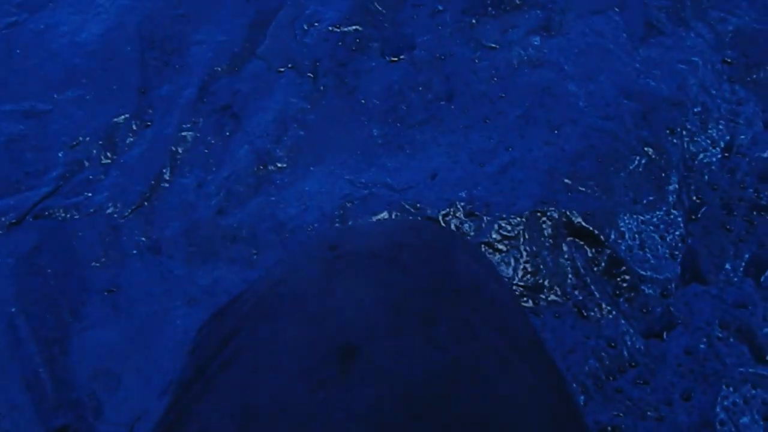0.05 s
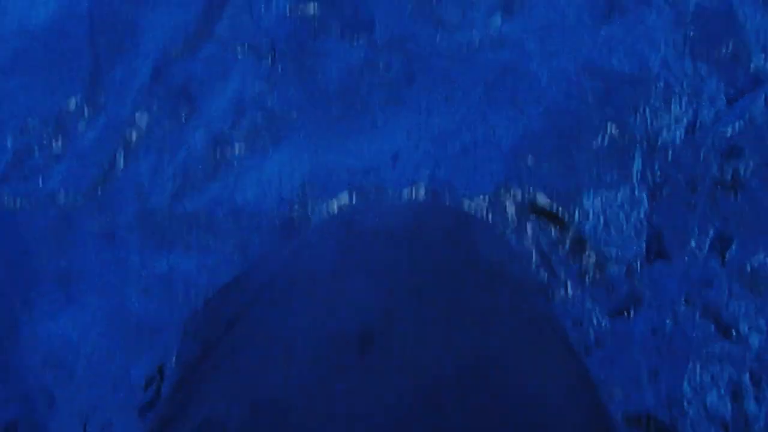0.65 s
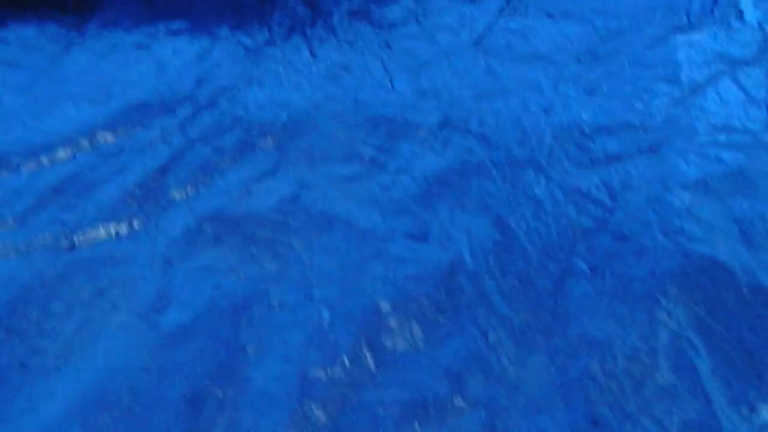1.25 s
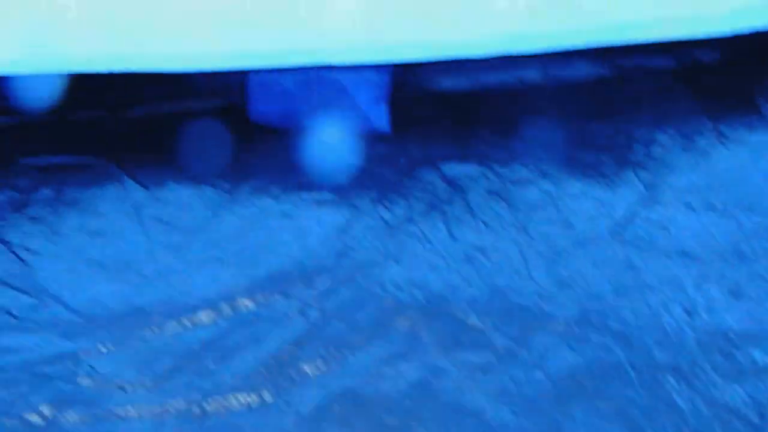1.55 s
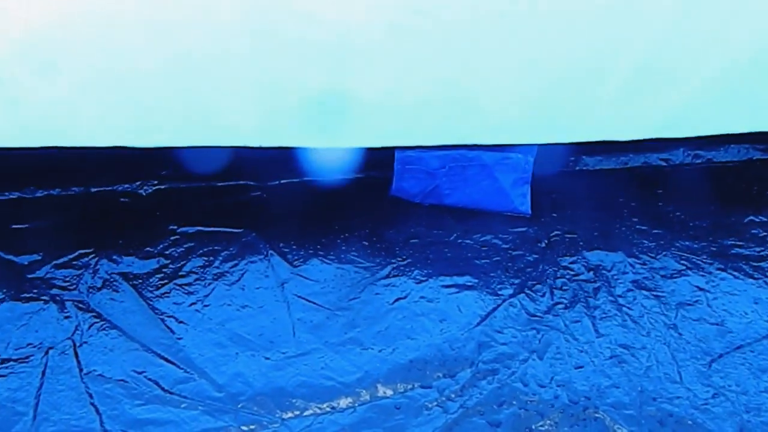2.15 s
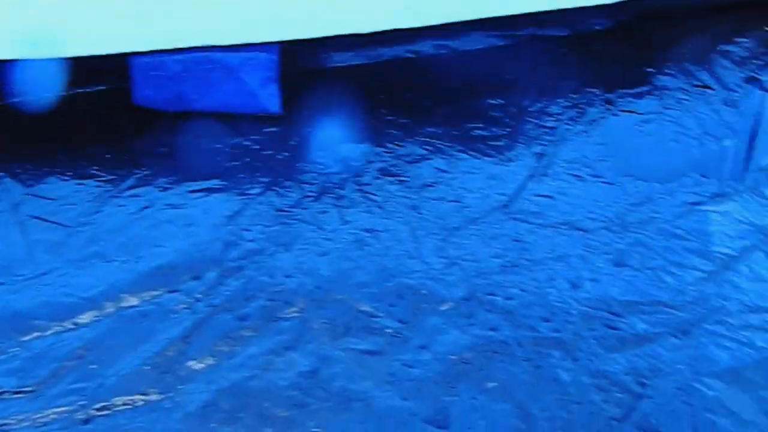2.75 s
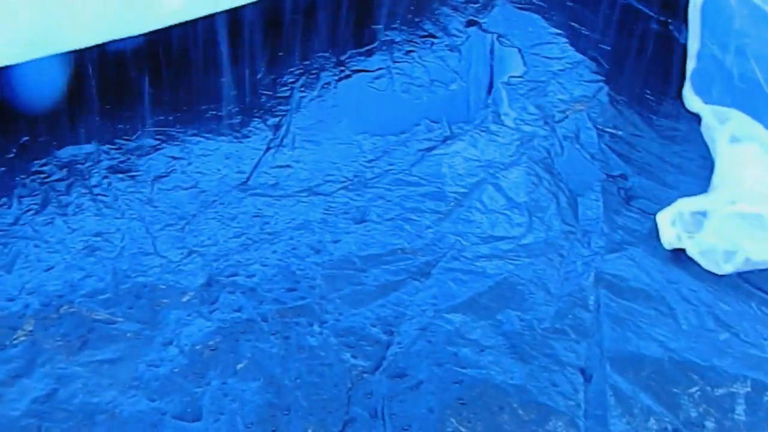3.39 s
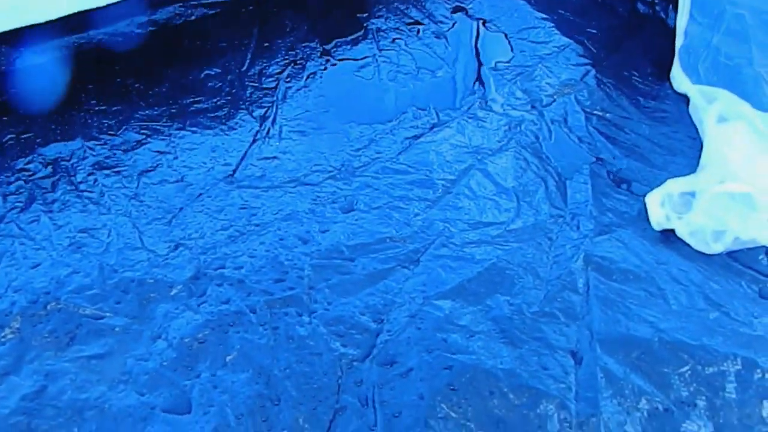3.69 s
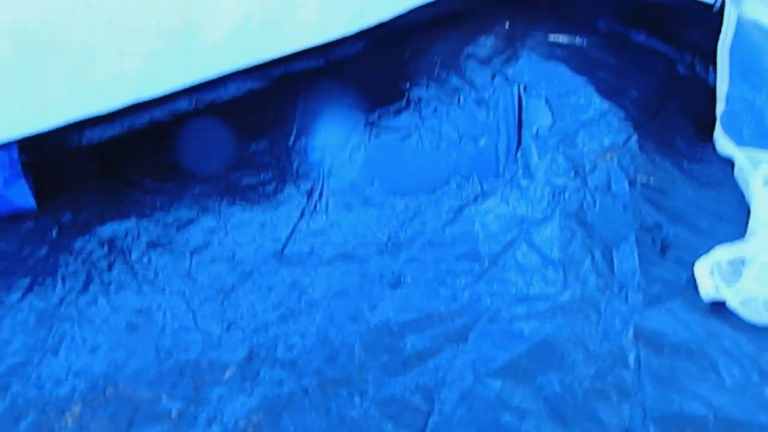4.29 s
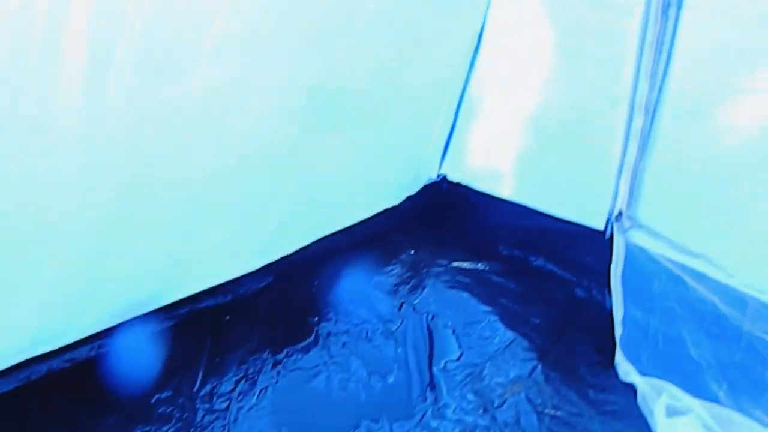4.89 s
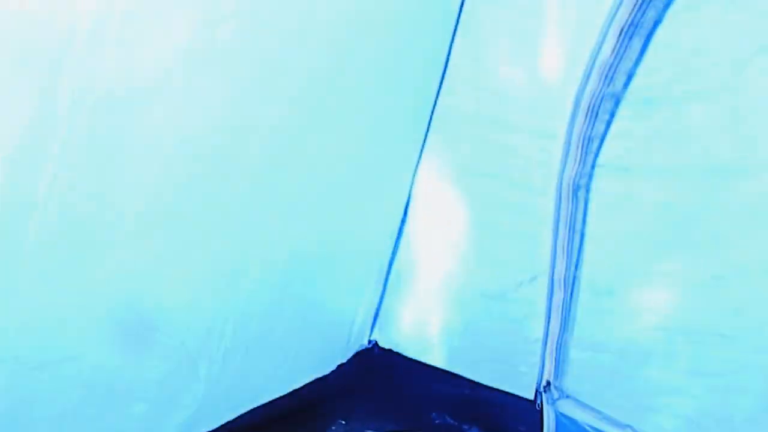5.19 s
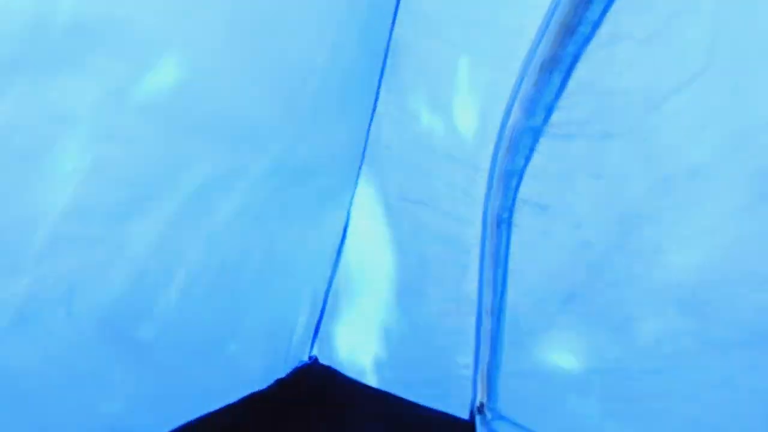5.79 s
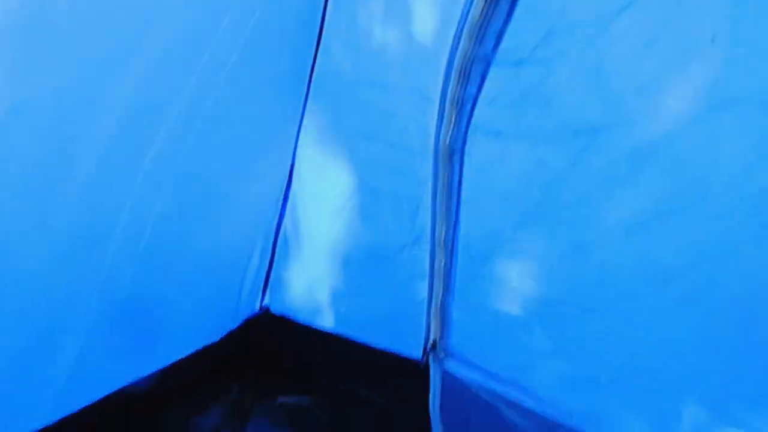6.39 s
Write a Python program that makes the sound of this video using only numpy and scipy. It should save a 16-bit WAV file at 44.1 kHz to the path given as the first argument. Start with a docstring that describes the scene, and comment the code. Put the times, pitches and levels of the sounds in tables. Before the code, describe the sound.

A loud rush of water hits a nylon tent, drumming, slapping and spraying on the slack fabric. It runs off in quiet gurgles, plops and drips on the groundsheet. A second rush lands, then a water-filled fold drains in small gulps and a very faint whistle sounds far off. A third rush strikes and trickles away. The microphone is inside the tent, with soft outdoor air behind.

```python
"""Inside a nylon tent, over a soft outdoor wash. At 0 s a rush of water drums the slack fabric,
patters and sprays; single gouts slap it harder. Runoff then gurgles, plops and drips on the
groundsheet; the sound stutters at 1.7 s. A second rush lands at 2.9 s. From 4.2 s a water-filled
fold drains in gulps, and a faint whistle follows. The third rush lands at 5.5 s and runs off."""
import sys
import numpy as np
from scipy import signal
from scipy.fft import rfft, irfft
from scipy.io import wavfile
from scipy.ndimage import uniform_filter1d

SR = 44100
rng = np.random.default_rng(int(sys.argv[2]) if len(sys.argv) > 2 else 0)


def materialize(psi):
    """Save the field psi as 16-bit PCM at rate SR to the path in sys.argv[1].

    A 1-D psi becomes a single channel; in a 2-D psi each row is a channel.
    """
    bounded = np.clip(np.atleast_2d(psi).T, -1, 1)
    quanta = np.round(bounded * 32767).astype(np.int16)
    wavfile.write(sys.argv[1], SR, quanta)


N = 292881
TIME_S = np.arange(N) / SR
BINS_HZ = np.fft.rfftfreq(4096, 1 / SR)

# Table levels are relative within a layer.
# sheets of water, several per rush: t/s, rise/s, hold/s, level/dB, brightness/dB, froth/dB, fall/(dB/s)
WATER_SHEETS = [ (-.01, 0.017, 0.16, -20.5, 0, 3.5, 298), (0.181, 0.012, 0.12, -28, -2, 3, 244),
                (0.361, 0.037, .012, -24, 4.5, 4.5, 200), (.437, 0.01, 0.034, -26, 6.5, 2.5, 257),
                (0.526, 0.019, 0.091, -42, 4.5, 6.5, 72), (2.881, 0.053, .02, -43, 3, 7, 200),
                (2.953, 0.036, 0.099, -21.5, -.5, 4, 400), (3.093, 0.023, 0.069, -22.5, -1.5, 1, 143),
                (3.216, 0.0052, 0.035, -25, -2.5, 3.5, 500), (3.312, 0.026, 0.098, -43.5, -7, 4, 150),
                (3.394, 0.024, 0.14, -31.5, 0.5, 7.5, 123), (3.464, 0.078, 0.015, -39, 13.5, -8, 137),
                (3.624, 0.018, 0.018, -32.5, 0, 4, 142), (4.056, 0.0077, 0.0042, -48, 3.5, 4.5, 154.5),
                (5.446, 0.06, .008, -42.5, 2.5, 6.5, 200), (5.512, 0.028, .11, -19.5, -1.5, 2.5, 157),
                (5.563, 0.033, 0.023, -26, 3.5, 11.5, 200), (5.668, 0.021, 0.06, -23, 0, 4, 243),
                (5.787, 0.044, 0.13, -31.5, -1.5, 3.5, 206), (5.999, 0.007, 0.0085, -29, 6, 6, 200),
                (6.063, 0.036, 0.02, -35.5, 4, 9.5, 150), (6.147, 0.021, 0.023, -34, 7, 13, 117),
                (6.235, 0.017, 0.016, -35.5, 3, 3, 134), ]
# voices of a sheet: offset/dB, brightness share, froth share, drizzle/dB
DRUM = (2.5, -1, 0, -27)
PATTER = (-1.5, -0.46, 1, -19)
CHURN = (-3, -0.11, 1, -15)
SPRAY = (-5.5, 1.17, 0, -11.5)
# spectrum of one drop on wet fabric: f/Hz, level/dB
FABRIC_SPECTRUM = [(15, -17), (25, -20), (59, -5), (144, -1), (255, -3.5), (371, -6.5), (473, -10.5),
                   (769, -6), (1120, -6), (1640, -13), (2520, -22.5), (7830, -28.5), (8970, -29),
                   (14200, -37.5), (15800, -46)]
# wall resonances and hollows: f/Hz, width/Hz, level/dB
WALL_MODES = [(335, 80, 3), (444, 39, -2), (756, 510, 0.5), (1630, 300, 0)]
# gouts slapping the fabric: t/s, level/dB, f/Hz, t60/s
GOUT_SLAPS = [(.061, -3, 338, 0.069), (.153, -2.5, 362, 0.056), (.216, -9, 900, 0.053),
              (.267, -21, 6900, 0.14), (.307, -21, 804, 0.051), (.389, -10.5, 1760, 0.01),
              (.405, -11, 6160, .2), (.451, -9, 460, 0.079), (.4845, -5.5, 2750, 0.055),
              (.53, -19.5, 2950, .052), (.7095, -24, 990, 0.043), (2.824, -29.5, 928, 0.04),
              (2.847, -40, 900, 0.045), (2.938, -26, 175, .05), (2.964, -21, 696, 0.063),
              (2.981, -12.5, 203, .05), (3.066, -7, 520, 0.029), (3.08, -14, 400, 0.016),
              (3.082, -15, 11000, 0.035), (3.163, -14.5, 910, 0.031), (3.2248, -12, 890, 0.023),
              (3.235, -8.5, 365, 0.041), (3.252, -14, 720, .076), (3.376, -22, 770, 0.071),
              (3.553, -15.5, 2440, 0.048), (3.67, -31, 9880, 0.3), (5.491, -27.5, 740, .05),
              (5.522, -15.5, 1430, 0.057), (5.534, -10, 247, 0.095), (5.612, -11, 727, .07),
              (5.731, -15, 133, 0.2), (5.743, -9.5, 660, 0.053), (5.7435, -10, 3870, 0.016),
              (5.843, -18.5, 1160, .06), (5.876, -16.5, 245, .044), (5.918, -18, 576, 0.044),
              (6.004, -22.5, 6000, 0.36), (6.151, -13.5, 1380, 0.095), (6.2, -16, 1500, 0.077),
              (6.245, -19.5, 1700, 0.13), (6.367, -21.5, 1360, .12)]
# drips on the groundsheet: t/s, level/dB, f/Hz, t60/s
FLOOR_DRIPS = [(.876, -28, 2150, 0.039), (.958, -31.5, 7900, 0.021), (1.08, -40.5, 8000, .06),
               (1.128, -38, 12000, 0.088), (1.181, -38, 5460, 0.19), (1.329, -33.5, 3600, 0.14),
               (1.332, -35, 9200, 0.17), (1.609, -32, 6600, 0.19), (1.737, -35, 3380, 0.07),
               (1.759, -32.5, 1630, 0.044), (1.86, -38.5, 4300, 0.1), (1.956, -29, 1050, 0.19),
               (2.128, -38, 2600, .15), (2.286, -35.5, 2180, 0.15), (2.368, -36.5, 6840, 0.078),
               (2.397, -32.5, 2020, 0.16), (2.473, -28.5, 1790, 0.027), (2.488, -33, 2050, .068),
               (2.508, -39, 10000, 0.055), (2.835, -34.5, 4900, 0.32), (3.881, -39, 7000, 0.056),
               (3.932, -41, 5840, 0.1), (4.253, -28, 2050, 0.15), (4.401, -30.5, 1380, .03),
               (4.497, -37, 8000, 0.11), (4.52, -37, 10500, 0.12), (4.65, -31.5, 2080, .07),
               (4.7325, -33.5, 907, .042), (4.796, -32, 2600, 0.1), (4.841, -32.5, 8500, 0.14),
               (4.858, -32.5, 2630, 0.29), (4.999, -36, 2350, 0.068), (5.1315, -31, 2360, 0.11),
               (6.367, -31.5, 6900, 0.31), (6.555, -35, 3950, 0.11)]
# bumps of the slack floor: t/s, level/dB, f/Hz, t60/s
FLOOR_BUMPS = [(1.398, -40, 170, 0.058), (1.513, -41.5, 138, .08), (2.4725, -33.5, 167, 0.023),
               (2.826, -34, 246, 0.16), (2.88, -39, 280, .07), (4.239, -39.5, 106, .06),
               (4.325, -36.5, 275, 0.18)]
# single bubble plops and small ringing droplets: t/s, level/dB, f/Hz
PLOPS_AND_PINGS = [(1.024, -40, 3320), (1.114, -36.5, 4170), (1.181, -41, 5250), (1.223, -39, 3280),
                   (1.329, -32, 3430), (1.486, -36.5, 1900), (1.565, -37, 1360), (1.669, -38.5, 755),
                   (1.739, -38, 820), (1.759, -26.5, 802), (1.99, -30.5, 586), (2.002, -33, 800),
                   (2.066, -35.5, 790), (2.135, -35, 1520), (2.355, -30.5, 1410), (2.396, -32, 1480),
                   (2.432, -35, 1360), (2.465, -36, 1250), (2.541, -34.5, 1820), (2.704, -36.5, 1230),
                   (2.846, -30, 755), (3.226, -10, 807), (3.253, -17, 746), (3.263, -10.5, 685),
                   (3.272, -12, 630), (3.749, -28, 620), (3.882, -38, 7600), (3.932, -39, 5900),
                   (4.252, -30, 1110), (4.277, -21, 1220), (4.374, -32, 764), (4.4, -36, 1240),
                   (4.432, -31, 770), (4.648, -28, 644), (4.664, -30.5, 650), (4.734, -32, 1850),
                   (5.043, -36, 855), (5.093, -39, 764), (6.171, -11, 890), (6.202, -15.5, 834)]
# runoff, one curve after each rush: t/s, gurgle level/dB, fizz level/dB
EARLY_RUNOFFS = [
    [(0.9, -50.5, -51), (1.07, -67, -55.5), (1.312, -73, -54), (1.544, -51, -56.5), (1.704, -52.5, -54),
     (2.09, -48.5, -53.5), (2.294, -49, -49), (2.658, -56, -52), (2.88, -53.5, -52.5)],
    [(3.85, -51, -64), (4.064, -63, -73), (4.288, -56, -50.5), (4.428, -49, -83), (4.54, -47.5, -60),
     (4.696, -50.5, -50), (4.808, -49.5, -51), (5.316, -53, -49), (5.46, -53, -52)],
]
FINAL_RUNOFF = [(6.42, -52, -68), (6.514, -48, -49), (6.64, -53.5, -52)]
RUNOFF_CURVES = EARLY_RUNOFFS + [FINAL_RUNOFF]
GURGLE_COLUMN, FIZZ_COLUMN = 1, 2
# spread of bubble pitches: f/Hz, level/dB
GURGLE_SPECTRUM = [(240, -14), (400, -20), (505, -5.5), (644, -6.5), (993, -15), (1250, -4.5), (1450, -6),
                   (1950, -6.5), (5000, -11.5), (6500, -49), (11000, -120)]
# resonances of a water-filled fold: f/Hz, width/Hz, level/dB
FOLD_MODES = [(696, 180, -2), (1220, 160, 0), (1750, 180, -2.5), (2360, 170, -14), (3200, 180, -17),
              (3700, 170, -26)]
# gulps leaving the fold: t/s, hold/s, level/dB, fall/(dB/s)
FOLD_GULPS = [(4.24, .01, -44, 400), (4.29, 0.096, -42.5, 94), (4.64, 0.016, -44.5, 250),
              (4.73, 0.068, -46.5, 112)]
# outdoor wash: f/Hz, level/dB
WASH_SPECTRUM = [(15, -50), (25, -3.5), (284, 4), (392, 0.5), (654, -10.5), (791, -2), (1090, -6),
                 (1250, -7.5), (1390, -8), (2520, -11), (3220, -8.5), (4570, -13), (9990, -14),
                 (14200, -20), (15800, -27)]
# far whistle: t/s, level/dB
WHISTLE_CURVE = [(4.7, -77), (4.95, -64), (5.2, -64), (5.45, -65), (5.55, -73)]
# brief level dips: start/s, end/s
STUTTER_GAPS = [(1.694, 1.7125), (1.7145, 1.7235), (1.7265, 1.734)]


def amp(db):
    return 10 ** (np.asarray(db) / 20)


def unit_rms(x):
    return x / np.sqrt(np.mean(x ** 2) + 1e-20)


def spectrum(points):
    """Gain per bin, interpolated over log frequency."""
    hz, db = np.transpose(points)
    return amp(np.interp(np.log(BINS_HZ + 1), np.log(hz + 1), db))


def lowpass(hz, order):
    return 1 / np.sqrt(1 + (BINS_HZ / hz) ** (2 * order))


def highpass(hz, order):
    return np.sqrt(1 - lowpass(hz, order) ** 2)


def resonance(hz, width_hz):
    return 1 / (1 + (2 * (BINS_HZ - hz) / width_hz) ** 2)


def colour(x, gain):
    """Minimum-phase filter, peak gain 1: sharp attack, then ringing."""
    log_gain = np.log(np.maximum(gain / gain.max(), 1e-5))
    mirrored = np.concatenate([log_gain, log_gain[-2:0:-1]])
    taps = np.fft.ifft(np.exp(np.conj(signal.hilbert(mirrored)))).real
    return signal.oaconvolve(x, taps)[:len(x)]


def envelope(curves, column):
    """Gain per sample from a dB column; silent outside the curves."""
    gains = [amp(np.interp(TIME_S, rows[:, 0], rows[:, column], left=-200, right=-200))
             for rows in map(np.array, curves)]
    return uniform_filter1d(sum(gains), size=128)


def swell(start_s, rise_s, hold_s, fall_db_per_s):
    """Rise, hold, fall; one gain per 32 samples."""
    t = np.maximum(TIME_S[::32] - start_s, 0)
    return np.minimum(t / rise_s, 1) * amp(-fall_db_per_s * np.maximum(t - rise_s - hold_s, 0))


def power_sum(swells):
    """Swells added in power; one gain per sample."""
    return np.interp(TIME_S, TIME_S[::32], np.sqrt(sum(gain ** 2 for gain in swells)))


def add(mix, start_s, sound):
    part = mix[max(round(start_s * SR), 0):][:len(sound)]
    part += sound[:len(part)]


def steady(x, samples):
    """Evens out the level, keeps the finer grain."""
    power = uniform_filter1d(uniform_filter1d(x ** 2, samples), samples)
    return x / np.sqrt(np.abs(power) + 1e-3 * np.mean(x ** 2))


def wander(cutoff_hz):
    """Slow noise, rms 1."""
    hz = np.fft.rfftfreq(N, 1 / SR)
    return unit_rms(irfft(rfft(rng.standard_normal(N)) / (1 + (hz / cutoff_hz) ** 4), N))


def impacts(per_s, spread_db):
    """Random impulses: many small, few large."""
    size = amp(spread_db * np.minimum(rng.exponential(1, N), 4))
    return size * rng.choice([-1, 1], N) * (rng.random(N) < per_s / SR)


def shimmer(x, depth_db, patch_hz=700, patch_s=.008):
    """Each splash favours its own pitches: brief random patches of colour."""
    frames = signal.stft(x, nperseg=256)[2]
    across_bins = signal.windows.gaussian(21, patch_hz * 256 / SR / np.e)
    across_frames = signal.windows.gaussian(21, patch_s * SR / 128 / np.e)
    blur = np.outer(across_bins, across_frames)
    patches = unit_rms(signal.fftconvolve(rng.standard_normal(frames.shape), blur, "same"))
    return unit_rms(signal.istft(frames * amp(depth_db * patches), nperseg=256)[1][:N])


def rushes(heave_hz=130, drum_hz=450, churn_hz=1100, spray_hz=2500, clump_db=3, spray_clump_db=1):
    """Drops land in clumps: heavy ones drum, lighter ones patter and churn in air, the finest hiss."""
    clumps = wander(51)
    heavy = unit_rms(impacts(1300, 2.9) * amp(clump_db * clumps))
    light = heavy + amp(8.5) * unit_rms(impacts(4500, 4.1) * amp(clump_db * clumps))
    fine = unit_rms(impacts(20000, 4.2)) * amp(spray_clump_db * clumps) + amp(-3.5) * heavy
    trapped_air = froth(514.5, 2880, per_s=900, cycles=18.7, spread_db=6.3, octaves_per_s=23.8)
    wet = light + amp(-10.5) * trapped_air
    modes_db = sum(db * resonance(hz, width_hz) for hz, width_hz, db in WALL_MODES)
    wall = spectrum(FABRIC_SPECTRUM) * amp(modes_db)
    heave = steady(colour(heavy, wall * lowpass(heave_hz, 3)), samples=2200)
    drum = steady(colour(heavy, wall * highpass(heave_hz, 3) * lowpass(drum_hz, 4)), samples=900)
    patter = steady(colour(wet, wall * highpass(drum_hz, 4) * lowpass(churn_hz, 4)), samples=700)
    churn = steady(colour(wet, wall * highpass(churn_hz, 4) * lowpass(spray_hz, 4)), samples=700)
    spray = steady(colour(shimmer(fine, depth_db=0.8), wall * highpass(spray_hz, 4)), samples=800)
    load = sheet_flow(*DRUM)
    sway = (load / amp(-20)) ** 0.16  # a heavy load sets the whole wall heaving
    return ((drum + amp(-6.5) * sway * heave) * load + patter * sheet_flow(*PATTER)
            + churn * sheet_flow(*CHURN) + spray * sheet_flow(*SPRAY))


def sheet_flow(offset_db, bright_share, froth_share, drizzle_db):
    """Gain of one voice under all sheets and the stray drops behind them."""
    swells = []
    for start_s, rise_s, hold_s, db, bright_db, froth_db, fall_db_per_s in WATER_SHEETS:
        gain = amp(db + bright_share * bright_db + froth_share * froth_db)
        swells.append(gain * swell(start_s, rise_s, hold_s, fall_db_per_s))
        swells.append(amp(db + drizzle_db) * swell(start_s, rise_s + hold_s, 0, fall_db_per_s=37))
    return amp(offset_db) * power_sum(swells)


def splats(rows, sharpness, burst_gain, grains_per_cycle):
    """A blow and its dying droplet burst ring a patch of fabric; brighter bursts are denser."""
    out, t = np.zeros(N), np.arange(0, .2, 1 / SR)
    for start_s, db, hz, t60_s in rows:
        burst = rng.uniform(-1.52, 1, len(t)) * (rng.random(len(t)) < grains_per_cycle * hz / SR)
        burst *= burst_gain * np.exp(-np.log(1000) * t / t60_s)
        burst[0] = 1  # first contact
        detune = (BINS_HZ + 1) / hz - hz / (BINS_HZ + 1)
        blow = colour(burst, 1 / (1 + (sharpness * detune) ** 2))
        add(out, start_s, amp(db) * blow / np.abs(blow).max())
    return out


def mist(low_hz=5200, high_hz=13500, bright_share=.8):
    """Droplets thrown up by each sheet crackle down after it."""
    drops = shimmer(impacts(5000, 3.2), depth_db=2.5)
    crackle = steady(colour(drops, highpass(low_hz, 2) * lowpass(high_hz, 4)), samples=1400)
    falling = power_sum(
        amp(db + bright_share * bright_db) * swell(start_s + rise_s, .13, 0, fall_db_per_s=32)
        for start_s, rise_s, _, db, bright_db, _, _ in WATER_SHEETS)
    return amp(-22) * crackle * falling


def bubble(hz, t60_s, octaves_per_s, attack_cycles=1):
    """An air pocket rings, rising in pitch as it nears the surface."""
    t = np.arange(0, np.clip(t60_s, .004, .2), 1 / SR)
    turns = hz * np.cumsum(2 ** np.clip(octaves_per_s * t, -1, 1)) / SR
    attack = 1 - np.exp(-(turns / attack_cycles) ** 2)
    ring = np.sin(2 * np.pi * turns) * attack * np.exp(-np.log(1000) * t / t[-1])
    return ring / np.abs(ring).max()


def froth(low_hz, high_hz, per_s, cycles, spread_db, octaves_per_s, sizes=36):
    """Bubbles of many sizes, each ringing for a similar number of cycles."""
    out = np.zeros(N)
    for hz in np.geomspace(low_hz, high_hz, sizes) * rng.uniform(.96, 1.04, sizes):
        ring = bubble(hz, cycles / hz * rng.uniform(.5, 1.5), octaves_per_s * rng.uniform(0, 2))
        for when, rank, sign in rng.random((int(per_s * N / SR / sizes), 3)):
            gain = np.sign(sign - .5) * amp(-spread_db * np.log(rank + .03))
            add(out, when * N / SR, gain * ring)
    return unit_rms(out)


def runoff_events(column, per_s, low_hz, high_hz, spread_db):
    """Random rows (t/s, level/dB, f/Hz) following the runoff level; the faintest are dropped."""
    when, pitch, rank = rng.random((int(per_s * N / SR), 3)).T
    flow = envelope(RUNOFF_CURVES, column)[(when * N).astype(int)]
    db = 20 * np.log10(flow) + 6.5 - spread_db * np.log(rank + .1)
    hz = low_hz * (high_hz / low_hz) ** pitch
    return np.transpose([when * N / SR, db, hz])[db > -70]


def plops(t60_s=0.032, octaves_per_s=6.2, satellite_db=-8):
    """Single bubbles plop and small droplets ring; each sheds a smaller, higher bubble."""
    out = np.zeros(N)
    scattered = runoff_events(GURGLE_COLUMN, per_s=28, low_hz=750, high_hz=2730, spread_db=3.5)
    for start_s, db, hz in [*PLOPS_AND_PINGS, *scattered]:
        add(out, start_s, amp(db) * bubble(hz, t60_s, octaves_per_s, attack_cycles=1.84))
        satellite = bubble(hz * rng.uniform(1.27, 1.93), 0.22 * t60_s, 3 * octaves_per_s)
        add(out, start_s + rng.uniform(0, .018), amp(db + satellite_db) * satellite)
    return amp(-4) * out


def ticks(t60_s=0.063):
    """Tiny droplets ping during runoff."""
    drops = runoff_events(FIZZ_COLUMN, per_s=26, low_hz=2880, high_hz=12050, spread_db=3)
    rows = [(*drop, t60_s) for drop in drops]
    return splats(rows, sharpness=6.4, burst_gain=0.48, grains_per_cycle=0.35)


def gurgle():
    """Small bubbles ring in running water."""
    shape = spectrum(GURGLE_SPECTRUM)
    bubbles = froth(502, 4200, per_s=520, cycles=36, spread_db=4.1, octaves_per_s=32.8)
    water = unit_rms(colour(bubbles, shape * highpass(710, 1)))
    water += amp(-11) * unit_rms(colour(impacts(1200, 2.3), shape * highpass(630, 3)))
    return amp(-1.5) * steady(reflections(water), samples=2000) * envelope(RUNOFF_CURVES, GURGLE_COLUMN)


def fizz():
    """Fine droplets crackle and ping in the runoff."""
    drops = shimmer(impacts(3500, 0.87) * amp(2 * wander(90)), depth_db=-1.5)
    crackle = unit_rms(colour(drops, highpass(2900, 2) * lowpass(10000, 4)))
    pings = froth(3050, 14100, per_s=180, cycles=49, spread_db=3.1, octaves_per_s=13)
    crackle += amp(-15.5) * unit_rms(reflections(pings))
    return amp(-6) * steady(crackle, samples=2000) * envelope(RUNOFF_CURVES, FIZZ_COLUMN)


def draining_fold(rise_s=0.011):
    """A hollow fold rings as water gulps out."""
    hollow = sum(amp(db) * resonance(hz, width_hz) for hz, width_hz, db in FOLD_MODES)
    ring = colour(impacts(400, 3.2), hollow)
    gulps = power_sum(amp(db) * swell(start_s, rise_s, hold_s, fall_db_per_s)
                      for start_s, hold_s, db, fall_db_per_s in FOLD_GULPS)
    return steady(ring, samples=900) * gulps


def reflections(x, wet_db=-7, t60_s=0.081, echoes_per_s=2500):
    """Close tent walls add a short spatter of echoes."""
    t = np.arange(0, .15, 1 / SR)
    taps = rng.standard_normal(len(t)) * (rng.random(len(t)) < echoes_per_s / SR) * (t > .002)
    taps *= np.exp(-np.log(1000) * t / t60_s)
    return x + amp(wet_db) * signal.oaconvolve(x, taps / np.linalg.norm(taps))[:N]


def wash(crossover_hz=900, trickle_db=-2, level_db=-53):
    """Steady outdoor air below, trickle of the wet walls above."""
    air = colour(rng.standard_normal(N), lowpass(crossover_hz, 2))
    trickle = colour(shimmer(impacts(9000, 1.5), depth_db=2.5), highpass(crossover_hz, 2))
    return amp(level_db) * unit_rms(colour(air + amp(trickle_db) * trickle, spectrum(WASH_SPECTRUM)))


def whistle(hz=4150, width_hz=170):
    """Faint, far whistle of narrow-band noise."""
    ring = colour(rng.standard_normal(N), resonance(hz, width_hz))
    return amp(-2) * unit_rms(ring) * envelope([WHISTLE_CURVE], column=1)


def scene():
    """Mono mix at the middle of the tent."""
    blows = splats(GOUT_SLAPS, sharpness=0.99, burst_gain=0.94, grains_per_cycle=2.5)
    blows += splats(FLOOR_DRIPS, sharpness=1.13, burst_gain=0.99, grains_per_cycle=1.2)
    blows += splats(FLOOR_BUMPS, sharpness=1.3, burst_gain=0.6, grains_per_cycle=1.8)
    near = reflections(blows + plops() + ticks(), wet_db=-10.5, t60_s=0.05)
    return (rushes() + near + gurgle() + fizz() + draining_fold() + wash() + whistle())[None]


def record(dry, dip_db=-22, notch_hz=7870, ceiling=0.51, cutoff_hz=15850):
    """Brief stutter, narrow notch, soft clip, band limit."""
    in_gap = sum((TIME_S > start_s) & (TIME_S < end_s) for start_s, end_s in STUTTER_GAPS)
    x = dry * amp(dip_db * uniform_filter1d(in_gap.astype(float), size=40))
    x = signal.lfilter(*signal.iirnotch(notch_hz, Q=55, fs=SR), x)
    x = ceiling * np.tanh(x / ceiling)
    taps = signal.firwin(511, cutoff_hz, window=("kaiser", 9), fs=SR)
    return signal.oaconvolve(x, taps[None], "same")


dry = scene()
out = record(dry)
materialize(out)
```